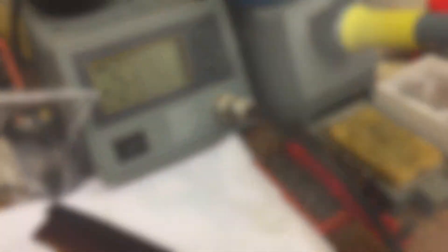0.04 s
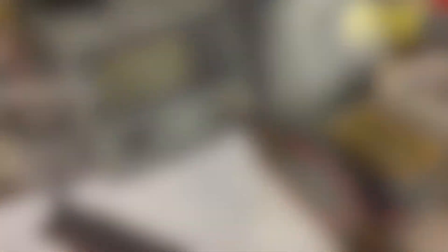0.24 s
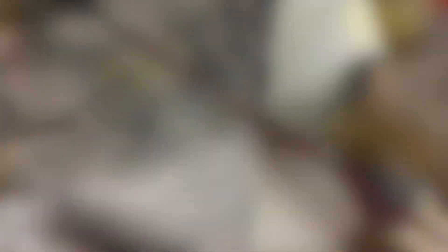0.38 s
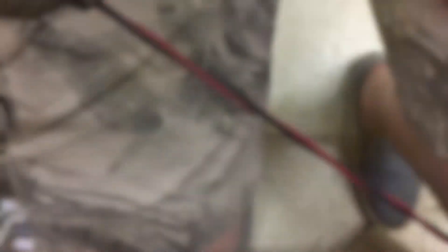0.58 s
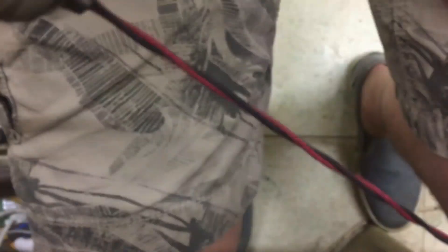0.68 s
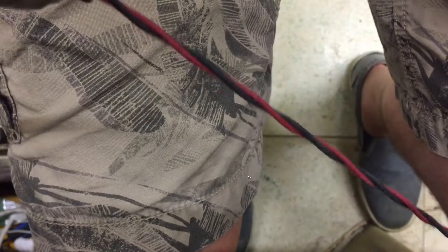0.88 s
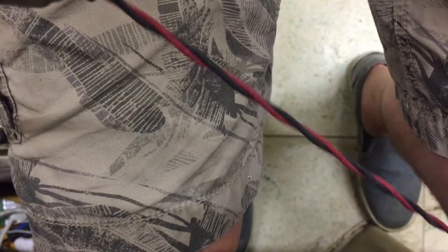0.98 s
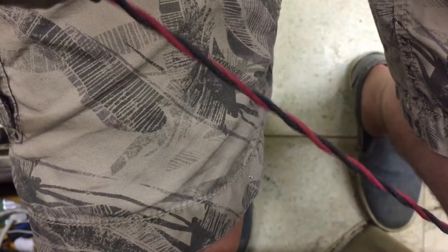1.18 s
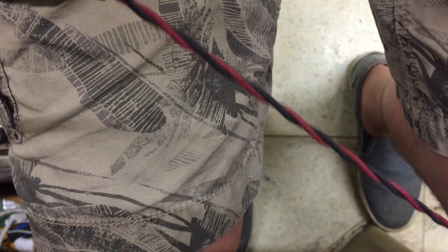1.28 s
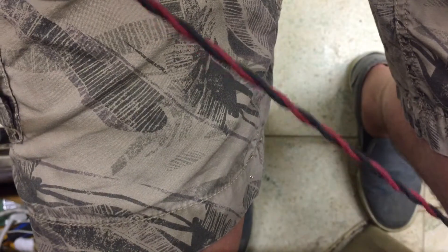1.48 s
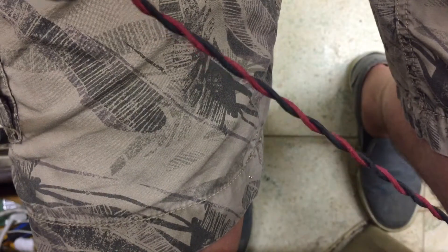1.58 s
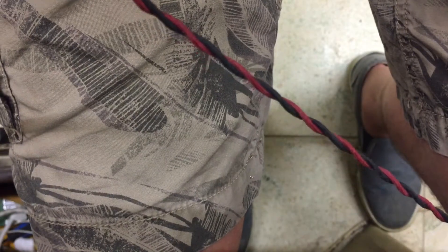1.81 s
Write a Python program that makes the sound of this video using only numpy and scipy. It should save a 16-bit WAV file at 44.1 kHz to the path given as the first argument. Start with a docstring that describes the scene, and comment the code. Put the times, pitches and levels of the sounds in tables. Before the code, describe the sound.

A small electric motor whirs up fast, runs about a second, then brakes abruptly with a rattle

```python
"""A small geared hand drill in a small workshop is triggered, spins up, comes nearer and is braked to a stop.
Sines at multiples of shaft and gear-mesh speed sing over grainy noise coloured by the housing.
Short gliding rings mark trigger and brake; low-mid noise grains rattle out at the end.
A decaying-noise room answers the tool; rumble, hiss, a wavering low hum and two thin tones lie behind.
One microphone feeds both channels alike.
"""
import sys
import numpy as np
from scipy import signal
from scipy.fft import rfft, irfft, next_fast_len
from scipy.io import wavfile
from scipy.ndimage import uniform_filter1d, map_coordinates

SR = 44100
rng = np.random.default_rng(int(sys.argv[2]) if len(sys.argv) > 2 else 0)


def pcm_store(signal):
    """Save signal as 16-bit PCM."""
    levels = np.round(np.clip(np.atleast_2d(signal), -1, 1) * 32767)
    wavfile.write(sys.argv[1], SR, levels.astype(np.int16).T)


def volts_from_decibels(level):
    """Turn decibel levels (scalar or array-like) into linear amplitude factors."""
    exponent = np.asarray(level, float) / 20
    return 10 ** exponent


N = 81585
TIME = np.arange(N) / SR  # s

# Background rumble and low hum: (time [s], rumble level before AIR_DB [dB], hum level [dB])
AIR_LEVELS = [(0, -66.5, -62.5), (.06, -81, -64), (.085, -71, -87), (.125, -81, -85), (.145, -69, -64.5),
              (.165, -79, -65), (.195, -81, -78), (.222, -69, -65), (.245, -89, -79), (.3, -74, -73),
              (.4, -79.5, -77), (.65, -83.5, -84), (1.5, -88.5, -81.5), (1.78, -91.5, -90.5),
              (1.805, -90, -83), (1.825, -85, -75.5), (1.84, -83.5, -71), (1.85, -86, -78)]
# Rumble spectrum: (frequency [Hz], relative gain [dB])
AIR_SPECTRUM = [(15, -65.5), (25, -18), (86, -2.5), (114, -9.5), (145, 8.5), (177, -6), (230, -3.5),
                (300, -30.5), (510, -120)]
AIR_DB = 1.5  # added to the rumble level
# Low hum pitch before its wander: (time [s], pitch [Hz])
HUM_PITCH = [(0, 197.3), (.17, 200), (.225, 184), (.3, 196), (1.6, 170.2), (1.8, 149.5), (1.85, 147)]
HUM_WANDER_HZ = 8.6  # scales the random pitch curve
# Room hiss: (time [s], level [dB])
HISS_LEVEL = [(0, -76), (.1, -72), (1.6, -84), (1.78, -86), (1.85, -83)]
# Hiss spectrum: (frequency [Hz], relative gain [dB])
HISS_SPECTRUM = [(140, -24), (230, 5), (420, -4.5), (1400, -11.5), (3000, -19.5), (15000, -30)]
# Thin tones in the quiet: (fade-in start [s], fade-out start [s], frequency [Hz], level [dB])
THIN_TONES = [(1.64, 1.71, 1520, -87), (1.73, 1.848, 1860, -92)]

# Trigger and brake blips, and housing flares near 4 kHz:
# (centre time [s], frequency at centre [Hz], glide [Hz/s], bell width as sigma [s], peak level [dB])
BLIPS = [(0.041, 1700, 8000, .009, -75.5), (0.037, 2700, 12000, 0.0057, -79),
         (0.044, 4400, 8002, 0.0053, -78), (.061, 7400, 0, .0007, -74), (0.081, 6000, 0, .001, -66),
         (0.094, 8100, 0, .0008, -66), (0.065, 1790, 3000, 0.0055, -66.5), (0.08, 2110, 3000, .0045, -60),
         (.088, 975, -800, 0.007, -62), (0.14, 1610, 3010, 0.0054, -52), (0.33, 4050, 1998.5, 0.008, -51),
         (0.43, 3700, 1998.5, 0.009, -44), (.725, 3970, -2000, 0.0081, -45.5),
         (0.83, 4000, 2000, 0.0085, -40), (1.576, 2330, -5000, 0.0033, -38), (1.57, 1300, -5, 0.0045, -41),
         (1.622, 944, 0, 0.0056, -53.5), (1.612, 720, 0, 0.0066, -56), (1.65, 335, 0, 0.0096, -68.5)]

# Decay of the workshop's answer: (frequency [Hz], time to fall 60 dB [s])
ROOM_DECAY = [(300, 0.16), (1500, 0.25), (3200, 0.079), (6000, 0.21), (12000, 0.17)]
ROOM_DB = -16

# Shaft speed before a slight wander: (time [s], speed [turns/s])
SHAFT_SPEED = [(.08, 70), (.11, 135), (.13, 188), (.145, 222), (.165, 258), (.19, 293), (.235, 316),
               (.28, 323), (.36, 328), (.42, 331.5), (.55, 332), (.72, 333), (.84, 332.3), (.96, 330.3),
               (1.08, 328.2), (1.2, 328.8), (1.3, 328), (1.562, 328), (1.571, 295), (1.58, 245),
               (1.59, 175), (1.603, 128), (1.64, 40)]
# Running drill: (time [s], lower noise [dB], upper noise before flutter [dB], relative gain of tones [dB])
RUN_LEVELS = [(0, -95, -85, 5), (.04, -83, -84, 34), (.075, -69.5, -82, -7), (.09, -61.5, -74, 0),
              (.115, -58, -63.5, 0), (.15, -54, -58, 0), (.2, -54, -54.5, 3), (.235, -56, -49, -1),
              (.26, -52.5, -48.5, 6.5), (.36, -50, -46.5, 2), (.55, -45, -42.5, -0.5), (.75, -44, -41, 1),
              (1, -42.5, -40, 1), (1.3, -43.5, -41, 3), (1.5, -42, -40, 1.5), (1.555, -42.5, -40.5, 1.5),
              (1.575, -39, -43.5, -3), (1.6, -48, -62.5, -1), (1.63, -72, -80, -3), (1.665, -82, -81, 0),
              (1.73, -91, -100, 12)]
SPEED_LAW_DB, FULL_HZ = 220, 330  # tone gain in dB per tenfold speed; speed of zero gain

# Shaft tones, one entry each: (order [multiples of shaft speed])
SHAFT_ORDERS = [1, 2, 3, 4, 6, 9, 15, 18, 21, 24, 30, 33, 36, 37.5, 39]
# (relative level [dB])
SHAFT_LEVELS = [-15.3, -23, -12, -24, -17, -13, -18, -21, -17, -36.5, -24.5, -34.5, -29, -29, -15]
# (slope of the limited random waver [dB])
SHAFT_WAVER = [.8, 3, 2.5, 4, 5, 5, 4, 4, 4, 4, 4, 4, 4, 4, 3]
EARLY_ORDER, EARLY_DB = 21, 8  # orders from here up regain up to this much while the shaft is slow
WHINE_LAG_DB, WHINE_SETTLE_S = 5, .4  # the highest order starts weaker; its lag is down to 1/e here

# Gear-tooth tones: (multiple of the mesh rate)
TEETH_ORDERS = [1, 2, 4, 8]
# (relative level [dB])
TEETH_LEVELS = [-28, -10, -24.5, -26]
MESH = 1.309  # gear-mesh rate over shaft rate
CHUCK_HZ, CHUCK_SWING_DB, CHUCK_PEAK_S = 9.9, 4, 1.254  # swell rate, depth each way, time of a peak

# Start strain: level, centre time and bell width (sigma)
START_DB, START_S, START_WIDE_S = -56, .139, .016
# Brake squeal: level, peak time and rise bell width (sigma), fade rate, start of the final cut
BRAKE_DB, BRAKE_S, BRAKE_RISE_S = -39.5, 1.571, .005
BRAKE_FADE_DB_PER_S, BRAKE_CUT_S = 620, 1.6

# Body spectrum of the drill noise: (frequency [Hz], relative gain [dB])
BODY_SPECTRUM = [(150, -50.5), (250, -36), (318, -14.5), (378, -20.5), (717, -14.5), (852, -8.5),
                 (1120, -10), (3010, -9.5), (3700, -8.5), (4630, -4), (15500, -9)]
# Centres of housing resonances and dips: (frequency [Hz])
HOUSING_CENTRES = [1300, 2970, 3440, 3690, 3950, 4600, 5180, 5950, 7500, 10350, 12800, 13300, 14500]
# At each centre: (full width at half the dB gain [Hz], gain [dB])
HOUSING_SHAPES = [(200, 0.5), (258, 5.5), (204, 8.5), (161, -8), (249, 6), (339, 3), (199.4, -0.5),
                  (160, 4), (370, -1.5), (410, -9), (400, 1.5), (320, 1.5), (1512, -8)]
SPLIT_HZ = 2400  # crossover of lower and upper noise
GATE = .07  # depth of the once-a-turn beat, as a fraction
GRIT_DB, PATCHY_DB = 1.6, 1.5  # spikiness; patchiness over time and frequency
PATCH_FADE_HZ = 6860  # patchiness is halved here and thins out above

# Fluttering housing rings: (frequency [Hz], full width at -6 dB [Hz], level over the upper noise [dB])
FLUTTER_RINGS = [(3008, 350, -15), (3440, 180, -16), (4606, 370, -16), (5230, 160, -17), (5990, 120, -16.5)]
FLUTTER_DB, FLUTTER_RATE = 6.5, 54.77  # scale of the random flutter; its knots per second

# Gears rattling out: (time [s], level [dB])
RATTLE_LEVEL = [(1.57, -90), (1.595, -50), (1.625, -57.5), (1.66, -71), (1.705, -81), (1.735, -100)]
# Rattle spectrum: (frequency [Hz], relative gain [dB])
RATTLE_SPECTRUM = [(150, -60), (300, -5), (900, 0), (2000, 1.5), (2650, -1.5), (2950, -28), (4000, -80.5)]
RATTLE_DB, RATTLE_RATE = 4, 260  # graininess; its knots per second


def unit(x):
    """Scale to rms 1."""
    return x / np.sqrt(np.mean(x ** 2) + 1e-20)


def along(points, hz):
    """Interpolate (frequency, value) points on a log axis."""
    f, v = np.transpose(points)
    return np.interp(np.log(hz + 1), np.log(f + 1), v)


def curves(rows):
    """One value per sample for each column after the time."""
    s, *cols = np.transpose(rows)
    return [np.interp(TIME, s, c) for c in cols]


def wobble(rate):
    """A smooth random curve with rate knots a second."""
    knots = rng.standard_normal(int(N * rate / SR) + 4)
    return map_coordinates(knots, [np.arange(N) * rate / SR])


def filtered(x, db_of):
    """Apply a gain in dB that depends on frequency."""
    m = next_fast_len(N + 8192)
    gain = volts_from_decibels(db_of(np.fft.rfftfreq(m, 1 / SR)))
    return irfft(rfft(x, m) * gain, m)[:N]


def bump(s, wide):
    """A Gaussian bell in time."""
    return np.exp(-.5 * ((TIME - s) / wide) ** 2)


def coloured_noise(points):
    """White noise shaped to a spectrum, at rms 1."""
    return unit(filtered(rng.standard_normal(N), lambda hz: along(points, hz)))


def room_air(level_db):
    """Low rumble of the place: shaped noise that follows a level curve."""
    return volts_from_decibels(level_db + AIR_DB) * coloured_noise(AIR_SPECTRUM)


def low_hum(level_db):
    """A sine whose pitch and level wander at random."""
    pitch, = curves(HUM_PITCH)
    phase = 2 * np.pi * np.cumsum(pitch + HUM_WANDER_HZ * wobble(50)) / SR
    return np.sqrt(2) * volts_from_decibels(level_db + 2.3 * wobble(30.16)) * np.sin(phase)


def room_hiss():
    """Broadband noise that sinks while the drill runs and slopes down toward the treble."""
    return volts_from_decibels(curves(HISS_LEVEL)[0]) * coloured_noise(HISS_SPECTRUM)


def blips():
    """Switch, housing and brake ring briefly: gliding sines under bells of wavering level."""
    total = np.zeros(N)
    for s, hz, glide, width, db in BLIPS:
        after = TIME - s
        # half the glide in the phase gives the full glide in pitch
        phase = 2 * np.pi * (hz + glide * np.clip(after, -.05, .05) / 2) * after
        total += volts_from_decibels(db + 2.0 * wobble(160)) * bump(s, width) * np.sin(phase)
    return total


def room(x):
    """The workshop answers after 300 samples; each frequency of its noise tail dies at its own speed."""
    hz, t, z = signal.stft(rng.standard_normal(SR // 2), SR, nperseg=256)
    decay = volts_from_decibels(-60 * t / along(ROOM_DECAY, hz)[:, None])
    tail = signal.istft(z * decay, SR, nperseg=256)[1]
    return signal.fftconvolve(np.pad(x, (300, 0)), tail / np.linalg.norm(tail))[:N]


def order_tone(turn, order, db, waver):
    """A sine locked to a multiple of the shaft angle, its level wavering within limits."""
    level = volts_from_decibels(db + 1.5 * waver * np.tanh(wobble(45) / 1.5))
    return level * np.sin(order * turn + rng.uniform(0, 2 * np.pi))


def shaft_tones(turn, law_db):
    """Shaft and commutator sing at orders of the turning rate, the high ones earlier in the spin-up."""
    lag_db = WHINE_LAG_DB * np.exp(-(TIME / WHINE_SETTLE_S) ** 4)
    early_db = -np.maximum(law_db, -EARLY_DB)
    total = np.zeros(N)
    for order, db, waver in zip(SHAFT_ORDERS, SHAFT_LEVELS, SHAFT_WAVER):
        if order == max(SHAFT_ORDERS):
            db = db - lag_db
        if order >= EARLY_ORDER:
            db = db + early_db
        total += order_tone(turn, order, db, waver)
    return total


def gear_tones(turn, chuck_db):
    """Gear teeth sing at multiples of the mesh rate, swelling with the chuck's slow swing."""
    teeth = sum(order_tone(turn, k * MESH, db, 1.8) for k, db in zip(TEETH_ORDERS, TEETH_LEVELS))
    return volts_from_decibels(chuck_db) * teeth


def gritty_noise(turn):
    """Brush and gear noise: spiky white noise beaten once a turn, patchy over time and frequency."""
    spikes_db = 2 * GRIT_DB * np.tanh(wobble(900) / 2)
    drift_db = 0.91 * wobble(59.38) + 0.14 * wobble(11.0)
    grit = rng.standard_normal(N) * (1 + GATE * np.cos(turn)) * volts_from_decibels(spikes_db + drift_db)
    hz, _, z = signal.stft(grit, SR, nperseg=512)
    field = uniform_filter1d(rng.standard_normal(z.shape), size=4, axis=0)
    field = uniform_filter1d(field, size=6, axis=1)
    patches_db = PATCHY_DB * unit(field) / (1 + (hz[:, None] / PATCH_FADE_HZ) ** 2)
    return signal.istft(z * volts_from_decibels(patches_db), nperseg=512)[1][:N]


def housing_gain(hz):
    """Body spectrum in dB with the housing's resonances and dips added."""
    peaks = zip(HOUSING_CENTRES, HOUSING_SHAPES)
    return along(BODY_SPECTRUM, hz) + sum(db / (1 + (2 * (hz - c) / w) ** 2) for c, (w, db) in peaks)


def housing_noise(grit):
    """The housing colours the grit, which is split into lower and upper noise of rms 1."""
    low = filtered(grit, lambda hz: housing_gain(hz) - 10 * np.log10(1 + (hz / SPLIT_HZ) ** 6))
    high = filtered(grit, lambda hz: housing_gain(hz) - 10 * np.log10(1 + (SPLIT_HZ / (hz + 1)) ** 6))
    return unit(low), unit(high)


def flutter_rings(chuck_db):
    """Narrow noise bands of the housing flutter at random and swell with the chuck."""
    total = np.zeros(N)
    for centre, width, db in FLUTTER_RINGS:
        flutter = volts_from_decibels(FLUTTER_DB * wobble(FLUTTER_RATE) + chuck_db)
        noise = rng.standard_normal(N)
        ring = unit(filtered(noise, lambda hz: -20 * np.log10(1 + (2 * (hz - centre) / width) ** 2)))
        total += volts_from_decibels(db) * unit(flutter * ring)
    return total


def start_strain(turn):
    """The third shaft order swells briefly during the spin-up."""
    return np.sqrt(2) * bump(START_S, START_WIDE_S) * order_tone(turn, 3, START_DB, .5)


def brake_squeal(turn):
    """Twice the mesh rate flares under the brake, fades steadily in dB and is cut off."""
    after = TIME - BRAKE_S
    fade = volts_from_decibels(-BRAKE_FADE_DB_PER_S * np.abs(after))
    shape = np.where(after < 0, bump(BRAKE_S, BRAKE_RISE_S), fade)
    # linear cut lasting two rise widths
    shape = shape * np.clip((BRAKE_CUT_S - TIME) / BRAKE_RISE_S / 2 + 1, 0, 1)
    return np.sqrt(2) * shape * order_tone(turn, 2 * MESH, BRAKE_DB, 1.5)


def drill():
    """One shaft angle drives tones, noise beat and strain; tones strengthen steeply with speed."""
    speed, = curves(SHAFT_SPEED)
    low_db, high_db, tone_db = curves(RUN_LEVELS)
    law_db = SPEED_LAW_DB * np.log10(speed / FULL_HZ)
    turn = 2 * np.pi * np.cumsum(speed * (1 + .0007 * wobble(40))) / SR
    chuck_db = CHUCK_SWING_DB * np.cos(2 * np.pi * CHUCK_HZ * (TIME - CHUCK_PEAK_S))
    tones = shaft_tones(turn, law_db) + gear_tones(turn, chuck_db)
    low, high = housing_noise(gritty_noise(turn))
    high = high + flutter_rings(chuck_db)
    running = volts_from_decibels(low_db) * (low + 2 * volts_from_decibels(tone_db + law_db) * tones) + volts_from_decibels(high_db) * high
    return running + start_strain(turn) + brake_squeal(turn)


def rattle():
    """Loose gears knock about in the low mids as the tool stops: shaped, grainy noise."""
    grains = rng.standard_normal(N) * volts_from_decibels(RATTLE_DB * np.tanh(wobble(RATTLE_RATE)))
    shaped = unit(filtered(grains, lambda hz: along(RATTLE_SPECTRUM, hz)))
    return volts_from_decibels(curves(RATTLE_LEVEL)[0]) * shaped


def thin_tones():
    """Faint steady-pitched sines of wavering level, with 10 ms fades."""
    total = np.zeros(N)
    for start, end, hz, db in THIN_TONES:
        fade = np.clip(np.minimum(TIME - start, end + .01 - TIME) / .01, 0, 1)
        total += volts_from_decibels(db + 2.5 * wobble(40)) * fade * np.sin(2 * np.pi * hz * TIME)
    return np.sqrt(2) * total


def scene():
    """Tool, its room answer and the background at one microphone, both channels alike."""
    air_db, hum_db = curves(AIR_LEVELS)
    background = room_air(air_db) + low_hum(hum_db) + room_hiss() + thin_tones()
    tool = blips() + drill() + rattle()
    mono = tool + volts_from_decibels(ROOM_DB) * room(tool) + background
    return np.array([mono, mono])


def top_cut(x):
    """Nothing passes above the cut-off."""
    return signal.sosfilt(signal.butter(12, 15680, fs=SR, output="sos"), x)


def record(dry):
    """Hand on the finished microphone mix."""
    return top_cut(dry)


dry = scene()
out = record(dry)
pcm_store(out)
```